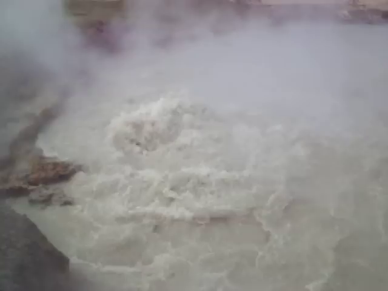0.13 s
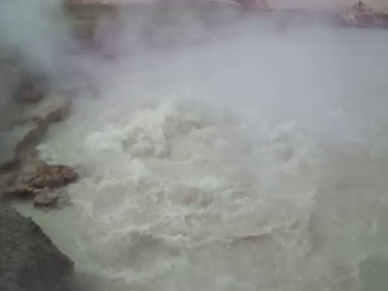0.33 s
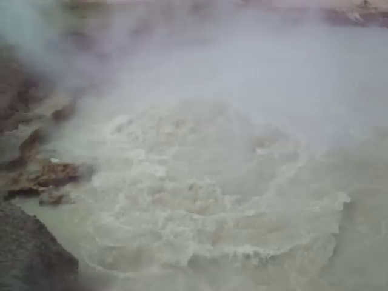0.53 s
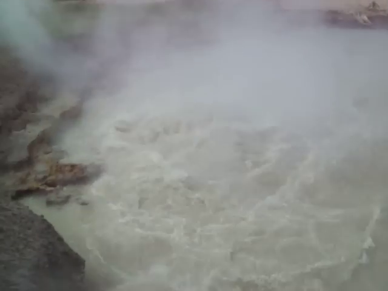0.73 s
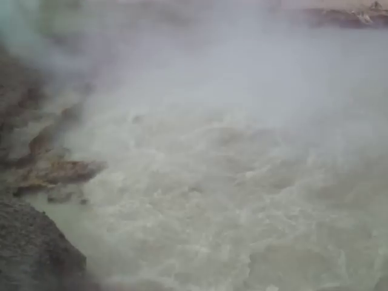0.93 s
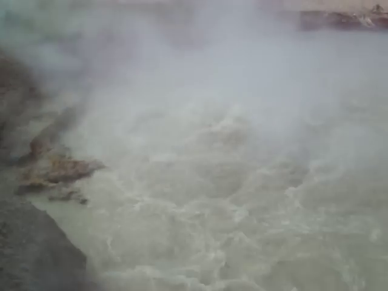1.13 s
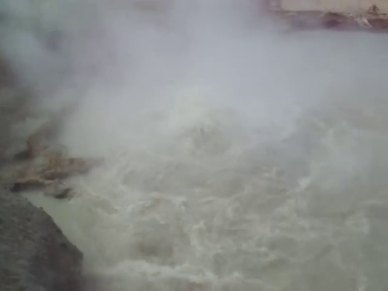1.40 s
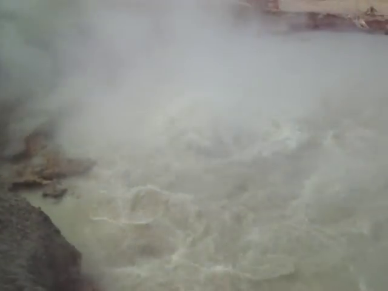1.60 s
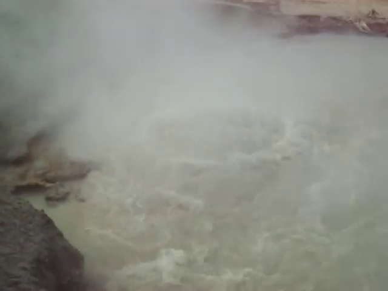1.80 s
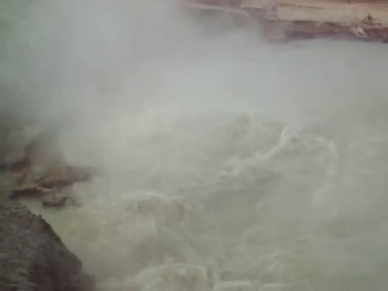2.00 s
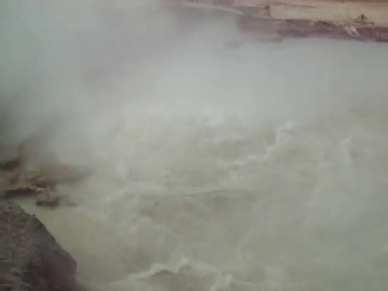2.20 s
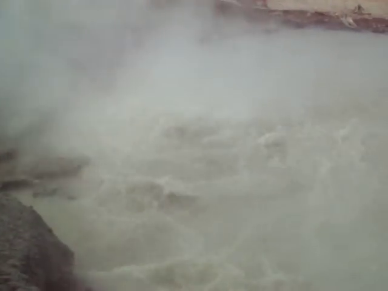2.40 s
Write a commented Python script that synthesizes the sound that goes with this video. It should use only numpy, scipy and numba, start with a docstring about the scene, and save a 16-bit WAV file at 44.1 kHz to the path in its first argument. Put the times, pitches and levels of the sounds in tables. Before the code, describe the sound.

Thick mud bubbling hard with a steamy rush, under rumbling wind on the microphone.

```python
"""A mud pool boils hard outdoors: from the start, bursting bubbles, spray and steam make a churning rush.
Wind buffets the microphone, a limiter ducks the sound under it, and at 0.2 s an overload cracks.
A low gurgle climbs and mud spatters down as the gusts reach their strongest, from 0.6 to 0.9 s.
The wind eases and the boil is at its hardest near 1.5 s. Then the gusts return, two more cracks
come just after 2.1 s, and the boil sinks a little at the end."""
import sys
import numpy as np
from scipy import signal
from scipy.fft import rfft, irfft
from scipy.io import wavfile
from numba import njit

SR = 44100
rng = np.random.default_rng(int(sys.argv[2]) if len(sys.argv) > 2 else 0)


def master_out(mix):
    """Clip the mix to full scale and print it as 16-bit PCM to the path in sys.argv[1]."""
    frames = np.transpose(np.atleast_2d(mix))
    ceiling = np.clip(frames, -1, 1)
    pcm = np.round(ceiling * 32767).astype(np.int16)
    wavfile.write(sys.argv[1], SR, pcm)


N = 112896
TIME = np.arange(N) / SR

# how hard the mud boils: time_s, level_db
BOIL_STRENGTH = [(0, 1), (.3, -0.5), (.43, 1.5), (.6, -0.5), (.86, -2), (.915, -7.5), (.955, 2),
                 (1.13, -0.5), (1.22, 2), (1.35, 2.4), (1.5, 3), (1.7, 2.5), (1.87, 0.5), (2.07, -3.5),
                 (2.3, 1.5), (2.4, -6.5), (2.56, -4.5)]
# tone of the rush and its spray: frequency_hz, level_db
RUSH_TONE = [(150, 3.5), (300, -3.5), (450, -6), (620, 4), (780, 0), (1050, -9), (1280, -6.5),
             (1480, -19.5), (1850, -20), (2200, -12.5), (2400, -12.5), (2660, -8), (2950, -13.5),
             (3700, -17.5), (4900, -17.5), (5800, -32)]
# tone of nearby droplets: frequency_hz, level_db
TICK_TONE = [(1500, -9), (2100, 3.5), (2700, -0.5), (3400, -5.5), (5000, 1.5), (5800, -5.5)]
# big bubbles, from deep glugs to bright plops: start_s, pitch_hz, peak_db, swell_ms
BIG_BUBBLES = [(.096, 546, -9.5, 2.2), (.105, 674, -12.5, 2.5), (.126, 197, -20, 7), (.14, 577, -15, 1.3),
               (.228, 716, -10, 1.6), (0.235, 186, -11, 16), (.324, 680, -15.5, 1.6),
               (.36, 745, -14.5, 2.4), (.437, 269.3, -4, 10.4), (.497, 232, -11.5, 12.3),
               (0.556, 1150, -6, 0.39), (.6545, 1000, -4, .45), (.685, 600, -15, 0.8),
               (.712, 675, -16.5, 3.3), (.759, 610, -12, 1.96), (.8435, 980, -2.5, 0.64),
               (.848, 950, -6.5, .8), (.874, 632, -9, 4), (0.891, 450, -13, 3.7), (1.457, 630, -15, 2.2),
               (1.664, 208.5, -14.5, 10.6), (1.706, 736, -15, 2), (1.875, 703, -15.5, 5.3),
               (1.955, 610, -15.5, 6.2), (2.191, 574, -22, 2.4), (2.267, 452, -13, 1.4),
               (2.279, 431, -13.5, 4.2), (2.371, 709.2, -18.5, 5.4), (2.482, 560, -15, 2.5)]
# a low gurgle that climbs as the mud heaves up: time_s, pitch_hz, level_db
GURGLE_PATH = [(0, 161.7, -36), (.18, 175, -21), (0.271, 218.9, -25.5), (0.461, 260.5, -14),
               (0.622, 341.2, -15), (0.719, 301.6, -29.5), (.86, 296.5, -12), (.96, 308.4, -43.5),
               (2.0, 169.9, -45.5), (2.25, 180.3, -21.5), (2.56, 221.6, -24.5)]
# spurts of spray: middle_s, level_db, half_length_s
SPRAY_SPURTS = [(0.072, -27, 0.0083), (0.107, -25.5, 0.0092), (.228, -27, 0.022), (.3, -32, .009),
                (0.367, -27, 0.011), (.431, -32.5, .004), (.497, -30.5, 0.024), (0.724, -32, 0.014),
                (0.877, -31, 0.015), (0.965, -29.5, 0.018), (1.44, -30, 0.0066), (1.511, -24.5, 0.01),
                (1.79, -28, 0.022), (2.025, -29, 0.004), (2.298, -31, 0.0059), (2.375, -34, 0.0097),
                (2.46, -36, 0.0099)]
# tone of the spurts: frequency_hz, level_db
SPURT_TONE = [(1200, -23.5), (2000, -1), (2650, 9.5), (3200, -1), (5000, -2), (5800, -12.5)]
# clots of mud spattering down: middle_s, level_db, half_length_s
MUD_SPATTERS = [(.556, -17, 0.0027), (.569, -19, .003), (.606, -19, 0.0071), (.632, -25, 0.0011),
                (.646, -13, .003), (.656, -9.5, 0.0027), (.81, -12.5, 0.0027), (.843, -20, 0.0045),
                (.882, -15.5, 0.0035)]
# tone of the spatters: frequency_hz, level_db
SPATTER_TONE = [(500, -6), (950, 6), (1400, -9.5), (1900, -7), (2400, -27), (3500, -22.5)]
# how hard the wind gusts: time_s, level_db
GUST_STRENGTH = [(0, -2), (.13, -1), (.3, 1.5), (.48, 2.5), (.57, 10), (.67, 8.5), (.72, -0.5), (.79, 10),
                 (.89, 9), (.95, -8.5), (1.12, 0.5), (1.35, -6.5), (1.75, -1), (1.95, -6), (2.12, 2),
                 (2.24, 4.5), (2.36, 1), (2.52, 6)]
# strength of the slow swirls of air: time_s, level_db
RUMBLE_STRENGTH = [(0, -20), (.11, -12.5), (.25, -17.5), (.6, -15.5), (.8, -10), (1.0, -19), (1.15, -18),
                   (1.6, -17), (1.9, -12), (2.22, -19.5), (2.5, -7.5)]
# tone of the slow swirls: frequency_hz, level_db
RUMBLE_TONE = [(12, 0.5), (22, -2), (32, 1.5), (55, -6), (90, -7), (150, -14.5), (300, -23.5), (700, -42.5)]
# tone of the small, fast swirls: frequency_hz, level_db
FLUTTER_TONE = [(30, -7.5), (80, 1), (150, 1), (260, -4), (420, -16), (700, -18.5), (1200, -40.5),
                (2000, -39.5), (4000, -56.5)]
# tone of the tiny, sharp swirls in the strongest gusts: frequency_hz, level_db
SPUTTER_TONE = [(150, -10.5), (400, 8), (900, -8.5), (1600, -20.5), (2200, -25.5), (3200, -41.5)]
# single bumps of air on the microphone: middle_s, pressure_relative_to_gust, width_ms
AIR_BUMPS = [(0.0814, 0.63, 3.7), (0.1445, -1.44, 1.7), (.1863, 2, 0.51), (0.235, 1.1, 0.76),
             (0.4, -1, 1.1), (0.4337, -1.5, 0.58), (0.4639, -1.86, 0.94), (0.5164, 0.9, 0.64),
             (0.5427, 1.26, 0.74), (0.5713, -1.5, 0.71), (0.609, -0.6, 0.55), (0.6318, -1.5, 0.42),
             (0.6557, -1.2, 0.91), (0.6874, -0.9, 0.74), (0.774, -0.65, 0.79), (0.7905, -1, 0.94),
             (.85, -1.8, 0.66), (1.4438, -2.1, 2.9), (1.553, 2.5, 0.94), (1.6514, -1.6, 1.2),
             (1.9024, 2.5, 2.3), (2.0963, -0.94, 1.6), (2.1295, 0.7, 2.5), (2.163, 2.1, 0.57),
             (2.1978, -1, 1.7), (2.2438, -1.5, 0.99), (2.3022, -0.3, 0.92), (2.3493, -1.15, 0.66),
             (2.4255, 1, 0.8), (2.5052, 1.1, 1.19)]
# overload cracks: time_s, flip_level_db, flip_count
OVERLOADS = [(.1859, 4.5, 3), (2.1289, 4.5, 1), (2.1617, 4.5, 1)]

# The boil's strength is added to these four levels.
RUSH_DB, SPRAY_DB, TICK_DB, BUBBLE_DB = -26, -26, -40, -32
DROPS_PER_S, DROP_SPREAD_DB = 1800, 2.5
FLUTTER_DB, SPUTTER_DB = -18.5, -35  # when the gust is at 0 dB
LIMIT_DB, ATTACK_S, RELEASE_DB_PER_S = -9.5, 0.00056, 10 / 0.03


def boiling_pool():
    """Churning rush, falling spray, ticking droplets and bubbles swell together with the boil."""
    rush = from_db(RUSH_DB) * with_tone(rng.standard_normal(N), RUSH_TONE)
    spray = from_db(SPRAY_DB) * with_tone(clicks(DROPS_PER_S, DROP_SPREAD_DB), RUSH_TONE)
    ticks = from_db(TICK_DB) * with_tone(clicks(per_s=170, spread_db=4), TICK_TONE)
    flicker = from_db(1.7 * wander(rate_hz=11))
    return from_db(curve(BOIL_STRENGTH)) * ((rush + spray) * flicker + ticks + small_bubbles())


def small_bubbles(pitch_count=16, ring_cycles=26):
    """Each bursting bubble rings briefly at one of several pitches."""
    pops = clicks(per_s=290, spread_db=1)
    pitch_choice = rng.integers(0, pitch_count, N)
    pitches_hz = np.geomspace(418, 990, pitch_count)
    rings = sum(ring(pops * (pitch_choice == k), hz, ring_cycles / hz) for k, hz in enumerate(pitches_hz))
    return from_db(BUBBLE_DB) * unit_level(rings)


def plops(pitch_rise=0.012):
    """Each big bubble swells, rings a little higher as it surfaces, and dies away."""
    out = np.zeros(N)
    for start_s, pitch_hz, peak_db, swell_ms in BIG_BUBBLES:
        age_s = np.maximum(TIME - start_s, 0)
        swells = np.minimum(age_s * 1000 / swell_ms, 30)  # age counted in swell times
        loudness = from_db(peak_db) * swells * np.exp(1 - swells)
        cycles = pitch_hz * age_s * (1 + pitch_rise * (swells / 2 - 1))
        out += loudness * np.sin(2 * np.pi * cycles)
    return out


def gurgle(width_hz=50):
    """Heaving mud gives a rough, low note that slides in pitch."""
    time_s, pitch_hz, level_db = np.transpose(GURGLE_PATH)
    angle = 2 * np.pi * np.cumsum(np.interp(TIME, time_s, pitch_hz)) / SR
    rough_note = wander(width_hz) * np.cos(angle) + wander(width_hz) * np.sin(angle)
    return from_db(np.interp(TIME, time_s, level_db)) * rough_note


def showers(bursts, tone):
    """The boil throws up short showers of droplets or clots, each landing with a click."""
    loudness = sum(from_db(level_db) * np.exp(-((TIME - middle_s) / half_length_s) ** 2)
                   for middle_s, level_db, half_length_s in bursts)
    return loudness * with_tone(clicks(DROPS_PER_S, DROP_SPREAD_DB), tone)


def wind():
    """Swirling air rumbles on the microphone; flutter, sputter and bumps rise with the gusts."""
    gust_db = curve(GUST_STRENGTH)
    rumble = from_db(curve(RUMBLE_STRENGTH)) * with_tone(rng.standard_normal(N), RUMBLE_TONE)
    lumpy_noise = rng.standard_normal(N) * from_db(4 * wander(rate_hz=55))
    flutter = from_db(FLUTTER_DB) * with_tone(lumpy_noise, FLUTTER_TONE)
    bumps = sum(pressure / (1 + 2 * ((TIME - middle_s) * 1000 / width_ms) ** 2) ** 2
                for middle_s, pressure, width_ms in AIR_BUMPS)
    sputter_gain = from_db(SPUTTER_DB + 2.14 * gust_db)  # grows faster than the gust itself
    sputter = sputter_gain * with_tone(clicks(per_s=700, spread_db=0.4), SPUTTER_TONE)
    return rumble + sputter + from_db(gust_db) * (flutter + bumps)


def overload_cracks(sound, top=.72, pin_ms=.75, flip_ms=.105, first_gap_ms=.36):
    """An overload pins the wave at the top and flips it for an instant, once or in a quickening run."""
    for time_s, flip_db, flip_count in OVERLOADS:
        late_ms = (TIME - time_s) * 1000
        pinned = np.exp(-np.minimum(np.abs(late_ms) / pin_ms, 10) ** 2)
        sound = sound + (top - sound) * pinned
        for k in range(flip_count):
            flip = np.exp(-np.minimum(2 * np.abs(late_ms) / flip_ms, 10) ** 4)
            sound = sound - from_db(flip_db) * flip
            late_ms = late_ms - first_gap_ms * .57 ** k
    return sound


@njit
def limiter_cut_db(excess_db):
    """A limiter turns a too-loud sound down fast, then lets go at a steady pace."""
    cut_db, held_db = np.zeros(len(excess_db)), 0.
    for i in range(len(excess_db)):
        bite_db = max(excess_db[i] - held_db, 0.) / (ATTACK_S * SR)
        held_db = max(held_db - RELEASE_DB_PER_S / SR, 0.) + bite_db
        cut_db[i] = held_db
    return cut_db


def from_db(db):
    """Turn decibels into a number to multiply by."""
    return 10 ** (np.asarray(db) / 20)


def unit_level(sound):
    """Scale a sound so its average level (rms) is 1."""
    return sound / np.sqrt(np.mean(sound ** 2) + 1e-20)


def curve(points):
    """Join (time_s, value) points with straight lines."""
    return np.interp(TIME, *np.transpose(points))


def with_tone(sound, tone):
    """Shape a sound's lows and highs by a tone table, then scale it to level 1."""
    points_hz, points_db = np.transpose(tone)
    hz = np.maximum(np.arange(N // 2 + 1) * SR / N, 1)
    gain = from_db(np.interp(np.log(hz), np.log(points_hz), points_db))
    edge_fade = np.minimum(hz / points_hz[0], 1) * np.minimum(points_hz[-1] / hz, 1)
    return unit_level(irfft(rfft(sound) * edge_fade * gain, N))


def wander(rate_hz):
    """A random wobble of level 1, mostly slower than rate_hz."""
    hz = np.arange(N // 2 + 1) * SR / N
    return unit_level(irfft(rfft(rng.standard_normal(N)) / (1 + (hz / rate_hz) ** 2), N))


def clicks(per_s, spread_db):
    """Clicks at random times, mostly small."""
    sizes = from_db(spread_db * np.minimum(rng.exponential(1, N), 4))
    signs = rng.choice([-1, 1], N)
    return sizes * signs * (rng.random(N) < per_s / SR)


def ring(pops, pitch_hz, fade_s):
    """Each pop starts a pure note that fades by 60 dB in fade_s."""
    decay = 1000 ** (-1 / (fade_s * SR))
    step = 2 * np.pi * pitch_hz / SR
    return signal.lfilter([0, np.sin(step)], [1, -2 * decay * np.cos(step), decay * decay], pops + 1e-18)


def low_pass(sound, hz):
    """Cut away the treble above hz."""
    return signal.sosfiltfilt(signal.butter(20, hz, fs=SR, output="sos"), sound)


def scene():
    """The pool heard through the wind, in one channel."""
    mud = boiling_pool() + showers(SPRAY_SPURTS, SPURT_TONE) + showers(MUD_SPATTERS, SPATTER_TONE)
    return (mud + plops() + gurgle() + wind())[None]


def record(dry):
    """The limiter ducks loud moments, peaks are rounded, the treble is cut and the cracks clip."""
    excess_db = np.maximum(20 * np.log10(np.abs(dry[0]) + 1e-9) - LIMIT_DB, 0)
    ducked = dry[0] * from_db(-limiter_cut_db(excess_db))
    rounded = .7 * ducked / (.7 ** 6 + ducked ** 6) ** (1 / 6)
    cracked = overload_cracks(rounded) * (TIME > .035)  # silent for the first 35 ms
    clipped = np.clip(low_pass(cracked, hz=5850), -.72, .72)
    return low_pass(clipped, hz=16000)[None]


dry = scene()
out = record(dry)
master_out(out)
```